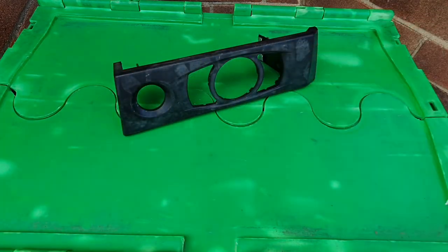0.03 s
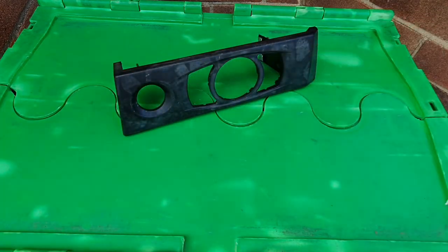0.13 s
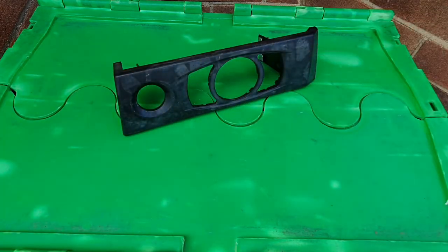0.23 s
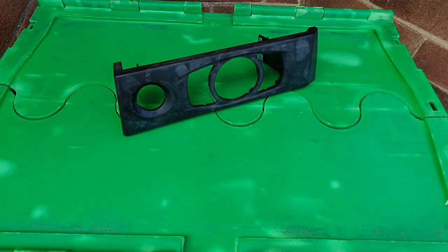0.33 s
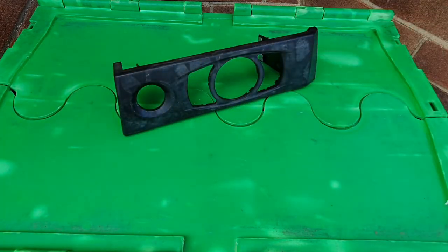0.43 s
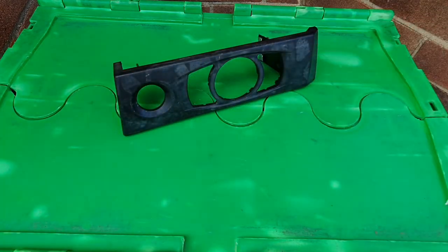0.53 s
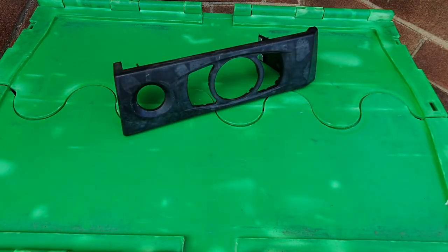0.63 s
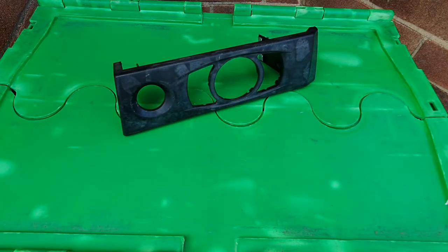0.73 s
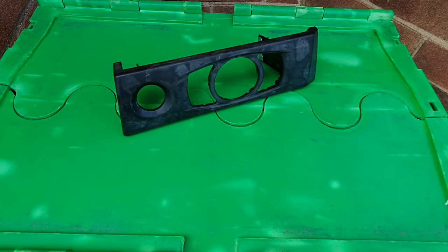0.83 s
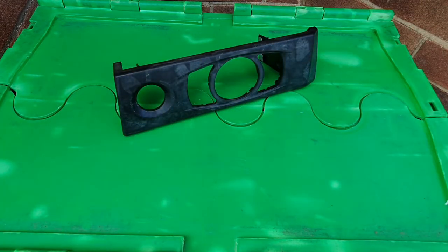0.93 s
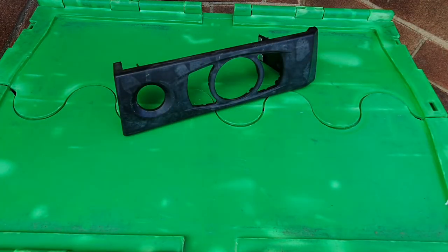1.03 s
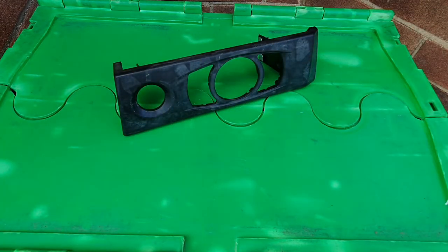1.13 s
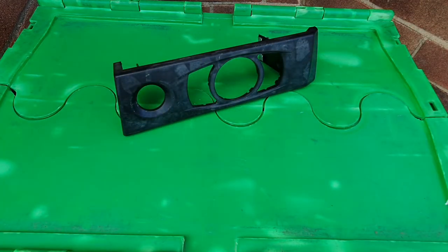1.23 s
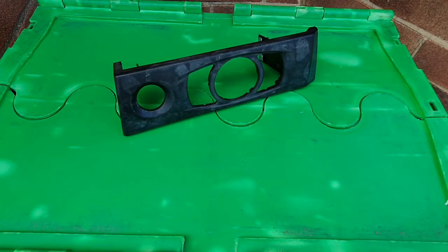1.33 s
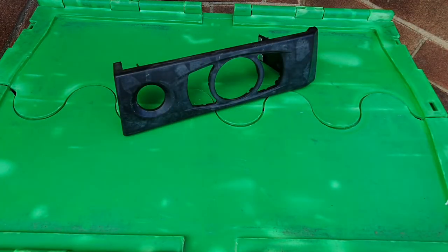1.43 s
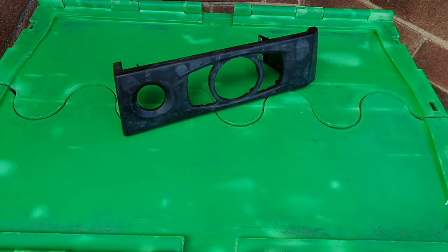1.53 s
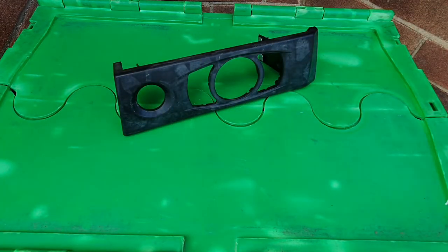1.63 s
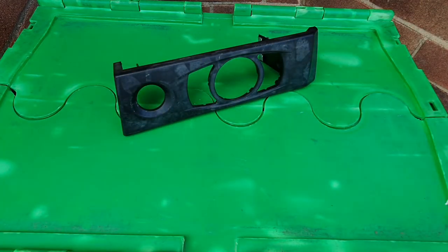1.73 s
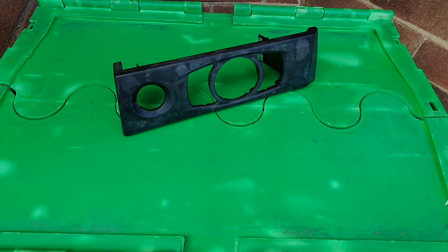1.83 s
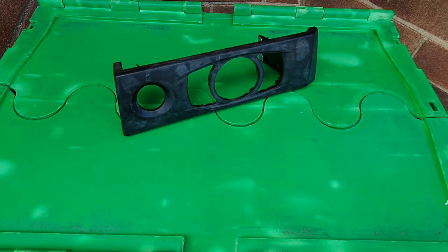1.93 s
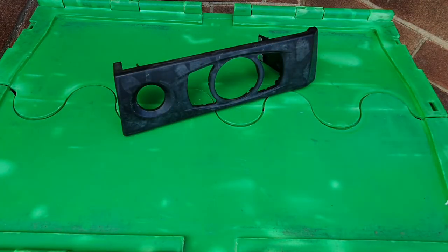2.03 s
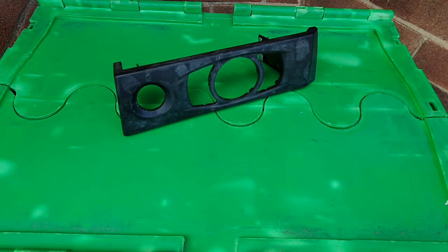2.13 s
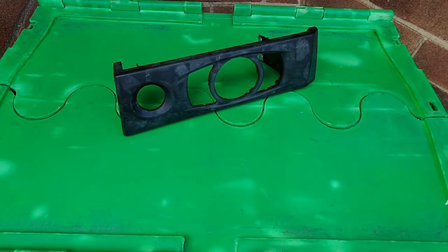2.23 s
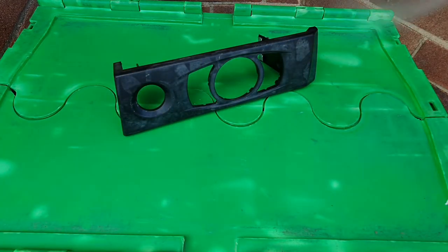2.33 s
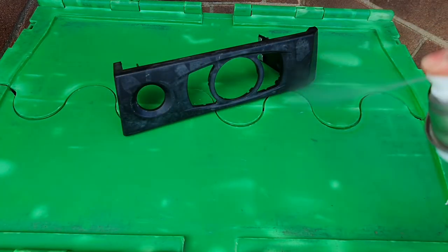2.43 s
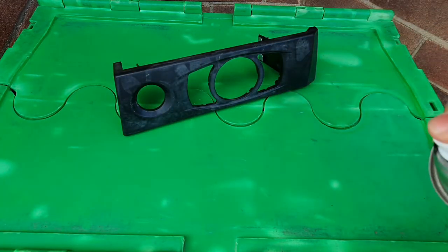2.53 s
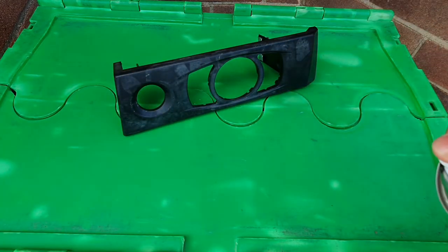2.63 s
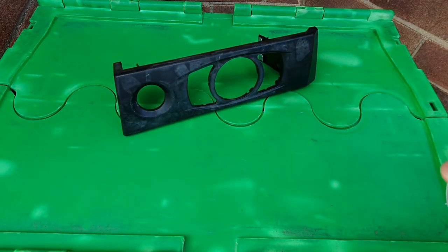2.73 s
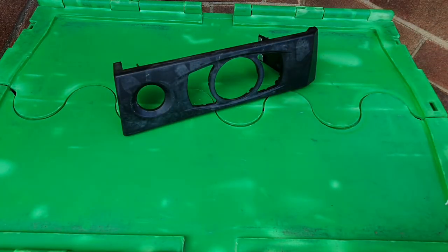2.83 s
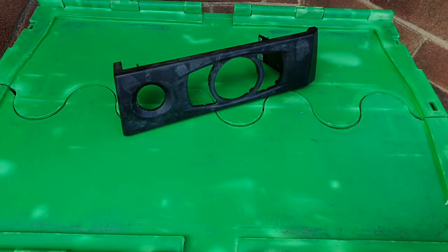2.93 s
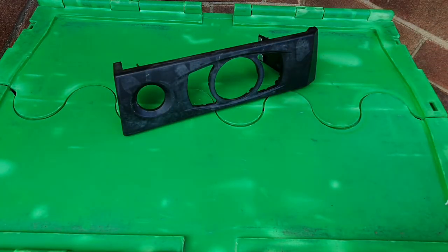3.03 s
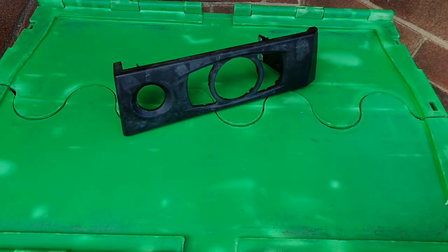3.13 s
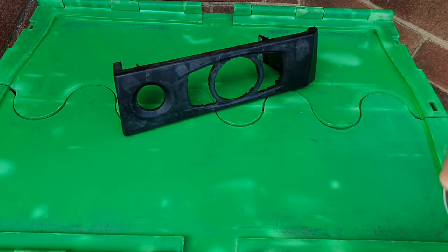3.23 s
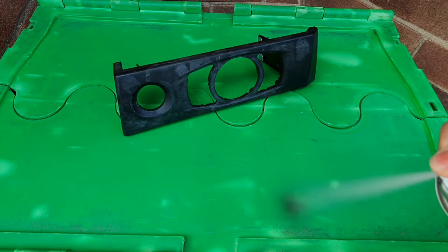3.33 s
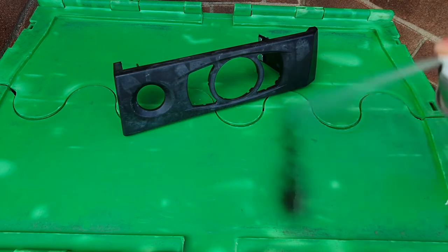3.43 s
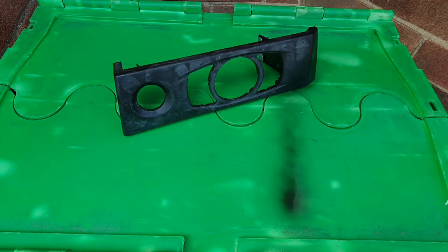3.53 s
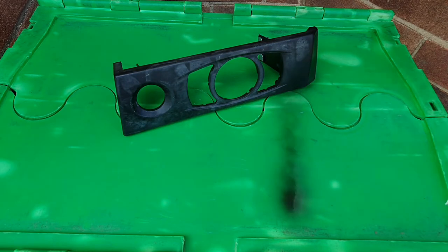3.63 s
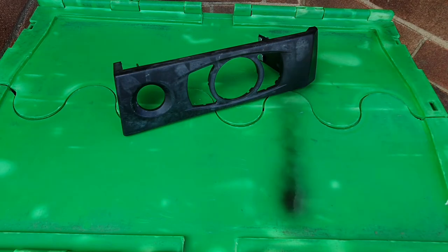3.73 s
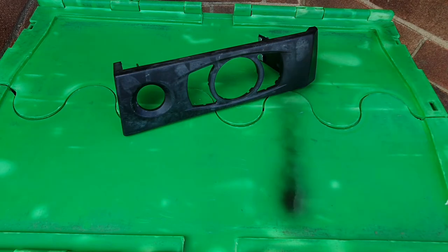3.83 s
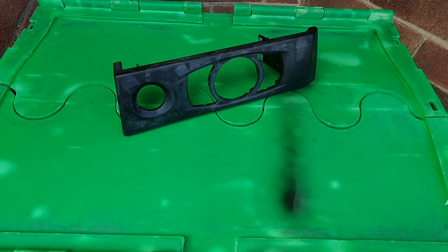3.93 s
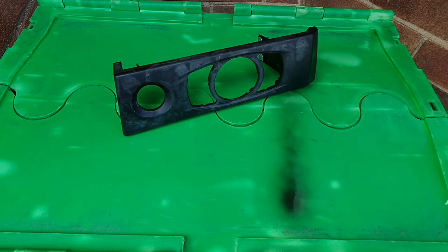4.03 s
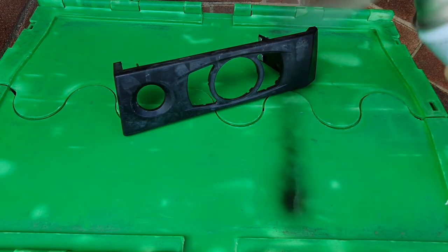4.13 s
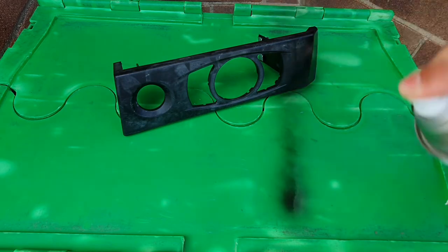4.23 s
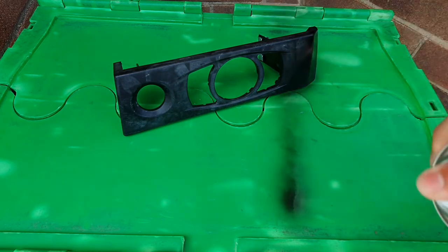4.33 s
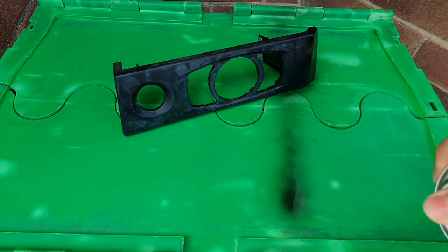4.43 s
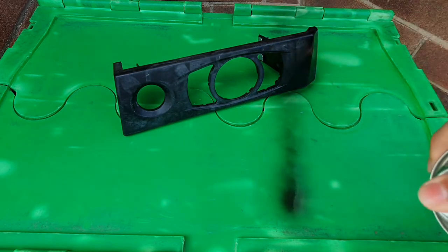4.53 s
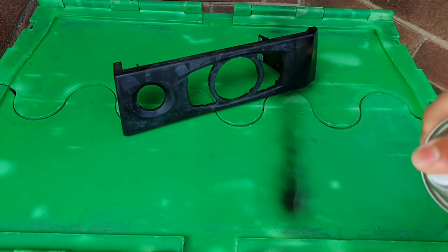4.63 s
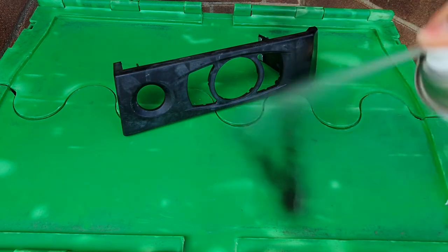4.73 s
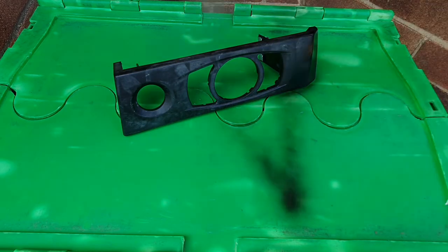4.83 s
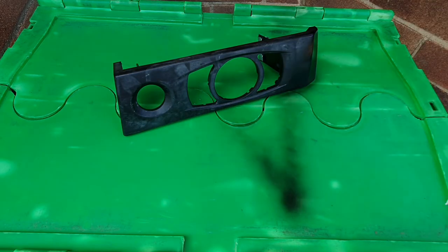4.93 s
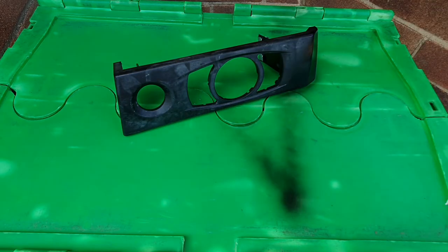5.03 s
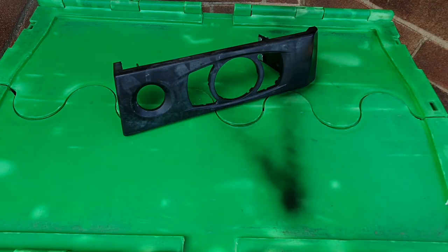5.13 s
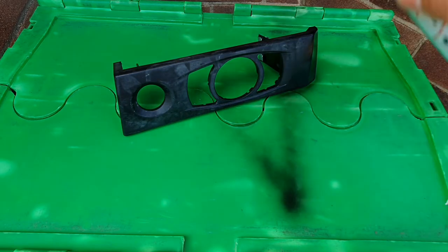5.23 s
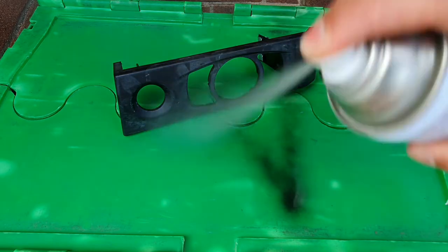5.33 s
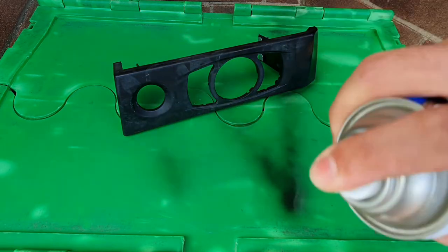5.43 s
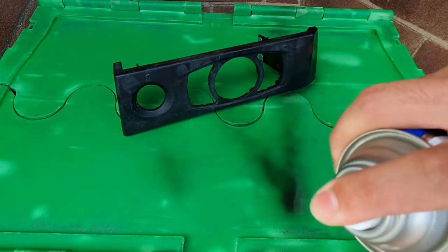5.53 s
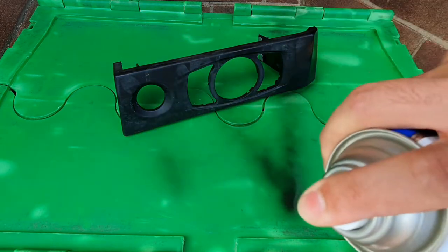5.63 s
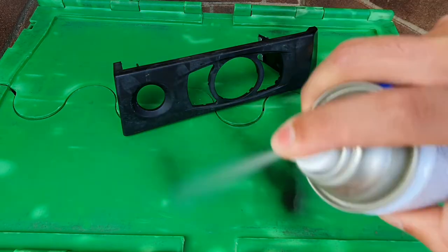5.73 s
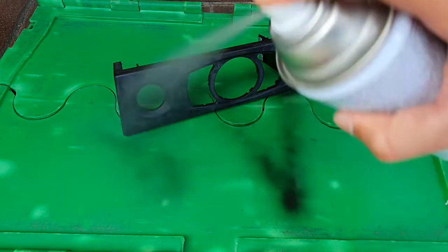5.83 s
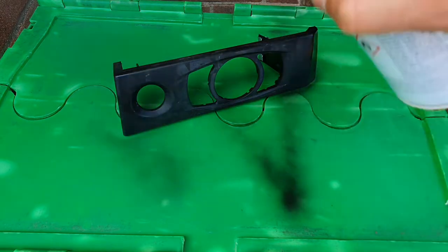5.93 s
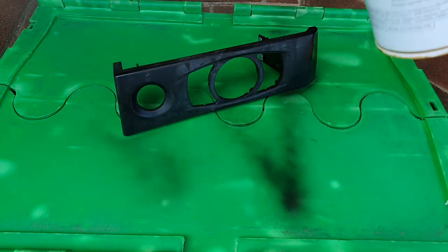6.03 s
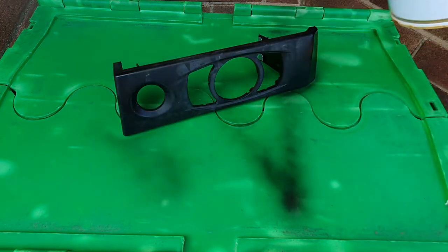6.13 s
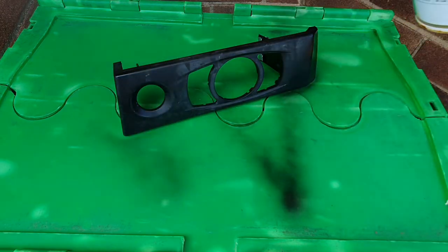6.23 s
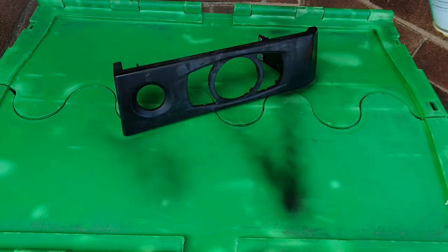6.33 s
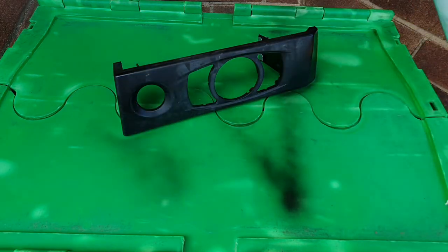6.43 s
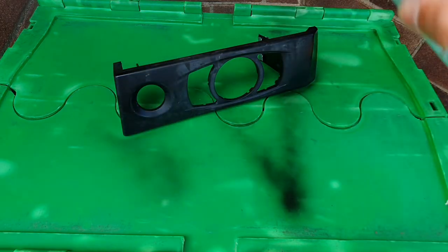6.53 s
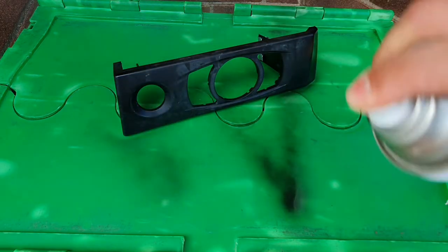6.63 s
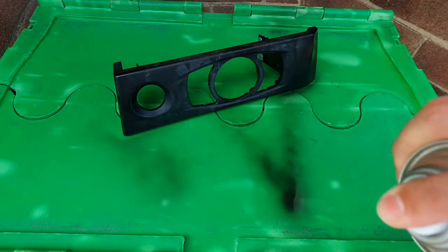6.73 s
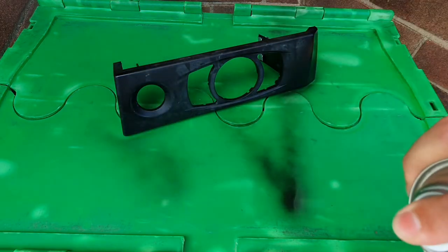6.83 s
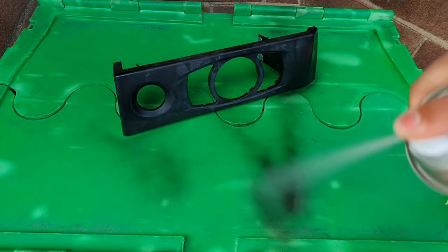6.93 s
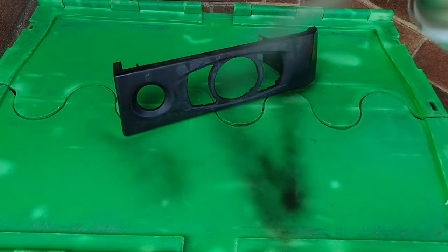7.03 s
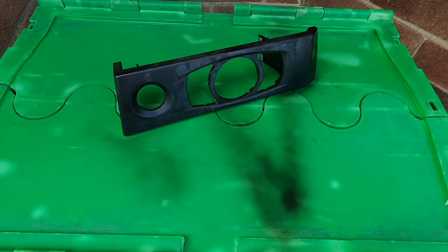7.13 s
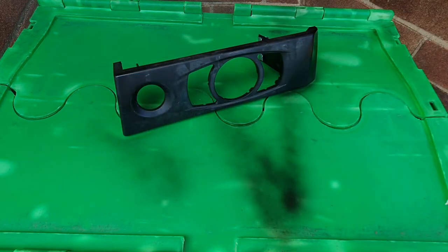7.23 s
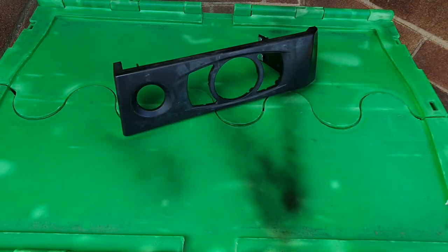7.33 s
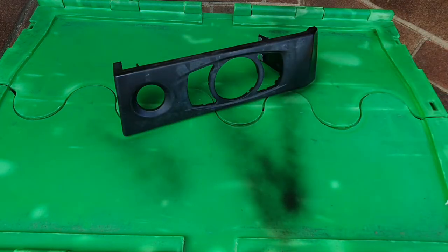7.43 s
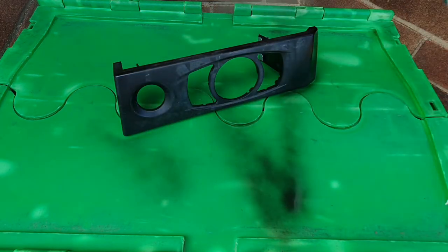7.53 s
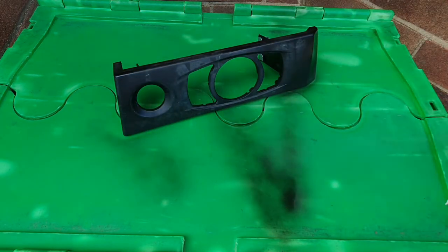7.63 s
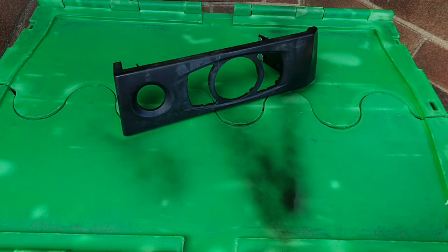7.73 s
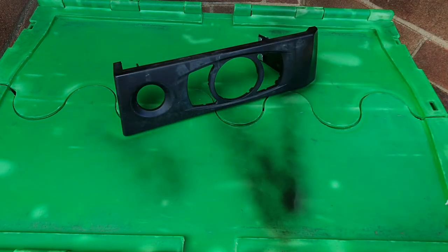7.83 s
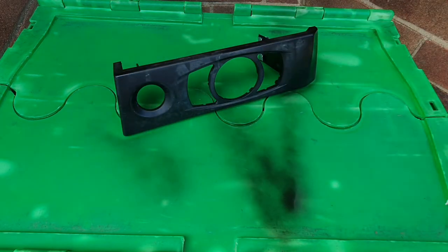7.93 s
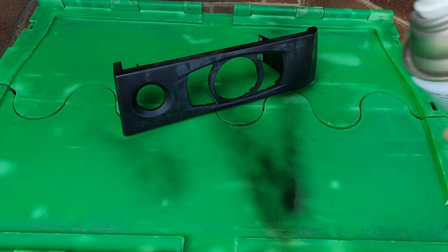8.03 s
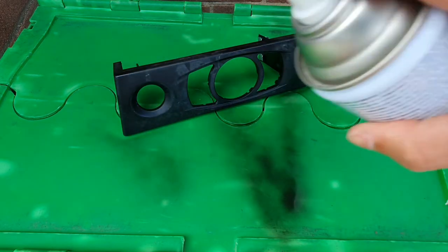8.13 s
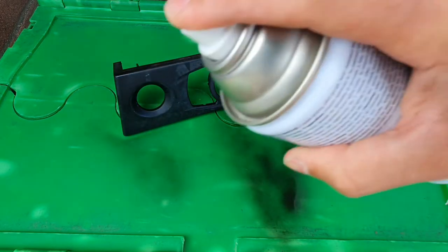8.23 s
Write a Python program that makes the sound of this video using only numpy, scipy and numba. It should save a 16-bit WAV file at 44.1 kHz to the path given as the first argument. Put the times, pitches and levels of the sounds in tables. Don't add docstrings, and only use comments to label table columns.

```python
import sys
import numpy as np
from scipy import signal
from scipy.fft import rfft, irfft
from scipy.io import wavfile
from scipy.ndimage import uniform_filter1d, minimum_filter1d
from numba import njit

SR = 44100
rng = np.random.default_rng(int(sys.argv[2]) if len(sys.argv) > 2 else 0)


def transcribe(signal):
    frames = np.atleast_2d(signal).T
    limited = np.clip(frames, -1, 1)
    pcm = np.round(limited * 32767).astype(np.int16)
    wavfile.write(sys.argv[1], SR, pcm)


def invert_db(x):
    u = np.asarray(x, float) / 20
    return 10 ** u


N = 365148
HZ = np.fft.rfftfreq(N, 1 / SR)
TIME = np.arange(N) / SR

# start_s, peak_db, ring_centre_hz, treble_db
HARD_SHAKE = [(0.031, -28, 1720, -10), (0.0493, -16.5, 2050, -13.5), (0.185, -17.5, 1800, -20.5),
              (0.2085, -11, 2120, -22.5), (0.2118, -13.5, 2580, -6.5), (0.2235, -11.5, 3740, -13.5),
              (0.2716, -11, 2080, -23), (0.3065, -8, 2150, -18.5), (0.3254, -6.5, 3640, -18),
              (0.3303, -6, 2740, -22), (0.343, -9, 3510, -14), (0.364, -12.5, 2120, -16.5),
              (0.406, -5.5, 2610, -19.5), (0.4188, -11.5, 1620, -16), (0.4477, -17.5, 2140, -12),
              (0.465, -14, 2310, -19), (0.477, -5.5, 6260, -18), (0.4858, -6, 4160, -7.5),
              (0.5205, -14.5, 2940, -19), (0.5363, -14.5, 1970, -27), (0.55, -20.5, 2810, -14),
              (0.618, -11.5, 3500, -14), (0.6769, -17, 2020, -20), (0.7024, -5, 4400, -21),
              (0.7062, -17.5, 5040, 2), (0.7456, -29.5, 2690, -20), (0.759, -17.5, 2240, -22),
              (0.8096, -22.5, 2270, -19), (0.8143, -12.5, 2200, -21.5), (0.828, -15, 3660, -8.5)]
# start_s, peak_db, ring_centre_hz, treble_db
SLOW_SHAKE = [(0.869, -16.5, 2490, -17), (0.8903, -6.5, 5270, -14.5), (0.903, -5, 4160, -31),
              (0.9073, -7, 3230, -7.5), (0.9347, -7, 3200, -6.5), (0.9577, -18, 2680, -28),
              (1.0105, -25, 2500, -31), (1.0175, -16.5, 2250, -23.5), (1.061, -17.5, 2100, -16),
              (1.1117, -21.5, 2680, -30), (1.118, -19.5, 2060, -22), (1.1777, -41, 1500, -28),
              (1.2013, -29, 2900, -31), (1.2192, -10, 4400, -19), (1.229, -14, 3540, -8),
              (1.312, -27.5, 3180, -15), (1.3346, -25, 2510, -15), (1.3433, -25.5, 4350, -27),
              (1.379, -26.5, 2260, -24), (1.4243, -31, 1600, -26), (1.448, -24, 3150, -20),
              (1.4567, -35, 4200, -28), (1.485, -22.5, 4200, -17), (1.5177, -34.5, 2010, -20),
              (1.5498, -24, 4320, -16), (1.565, -31.5, 4310, -14), (1.6244, -43, 1590, -19)]
OPEN_S = 0.018


def on_log(points, hz):
    f, db = np.transpose(points)
    return np.interp(np.log(np.maximum(hz, 1)), np.log(f), db)


def bell(hz, centre_hz, width_hz):
    return 1 / np.sqrt(1 + (2 * (hz - centre_hz) / width_hz) ** 2)


def curve(rows, column=1):
    rows = np.array(rows)
    return invert_db(np.interp(TIME, rows[:, 0], rows[:, column], -150, -150))


def walk(rate):
    k = int(SR / rate)
    steps = np.repeat(rng.standard_normal(N // k + 1), k)
    return 1.223 * uniform_filter1d(uniform_filter1d(steps, k), k)[:N]


def hiss(gain, lo_hz, hi_hz, alike, lag, flicker_db, rate, count=4):
    alike = np.clip(alike, 0, 1)
    shared, left, right = rfft(rng.standard_normal((3, N)))
    late = np.exp(-2j * np.pi * HZ * lag / SR)
    common = np.sqrt(alike) * shared * np.array([late, late ** 0])
    both = gain * (common + np.sqrt(1 - alike) * np.array([left, right]))
    place = (count + 1) * np.log(np.maximum(HZ, 1) / lo_hz) / np.log(hi_hz / lo_hz)
    out = np.zeros((2, N))
    for k in range(1, count + 1):
        band = irfft(both * np.clip(1 - abs(place - k), 0, 1), N)
        out += invert_db(flicker_db * walk(rate)) * band
    return out / np.sqrt(np.mean(out ** 2))


def passing(nearest_s, db, half_s):
    return invert_db(db) ** 2 / (1 + ((TIME - nearest_s) / half_s) ** 2) ** 2


def yard_notes():
    # centre_hz, width_hz, level_db
    resonances = [(298, 40, 0), (664, 23, 2), (800, 56, -9), (1670, 81, -9)]
    wall_hz = 317.8
    notes = 1 + sum(invert_db(db) * bell(HZ, f, w) for f, w, db in resonances)
    return notes * abs(1 + 0.18 * bell(HZ, 0, 2000) * np.exp(-2j * np.pi * HZ / wall_hz))


def road():
    # pitch_hz, level_db (per Hz)
    low_colour = [(16, -29.5), (28, -2), (49, -3.5), (87, 0.5), (106, -6.5), (141, -13.5), (221, -16),
                  (293, -17), (419, -16.5), (482, -22), (600, -42), (780, -59.5), (1320, -120)]
    # pitch_hz, level_db (per Hz)
    high_colour = [(300, -4), (500, -6), (1000, -1), (1600, -6.5), (2300, -9), (3500, -17), (5000, -24),
                   (6900, -27), (7400, -36.5), (9800, -36), (10300, -41), (15000, -51.5)]
    # nearest_s, roar_db, width_s, tyres_minus_roar_db
    car_rows = [
        (.2, -49, 0.34, -1.5),
        (2.6, -47, 0.42, -5.5),
        (3.22, -35.5, 0.47, -4.5),
        (5.0, -44, 0.93, -0.5),
        (5.7, -40.5, 0.33, -5.5),
        (6.15, -37.5, 0.44, -2),
        (8.03, -36, .35, -3),
    ]
    # time_s, level_db
    far_rumble = [(0, -37.5), (.4, -35.5), (.7, -39), (1.95, -39.5), (2.25, -33), (3.3, -32), (4.1, -35.5),
                  (4.85, -31.5), (5.7, -33), (6.45, -29), (7.1, -37.5), (7.6, -36), (7.95, -30.5),
                  (8.28, -34.5)]
    low, high = invert_db(on_log(low_colour, HZ)), invert_db(on_log(high_colour, HZ))
    notes = yard_notes()
    cars = [passing(*car[:3]) for car in car_rows]

    rumble = curve(far_rumble) * invert_db(2) * hiss(low, 22, 160, .98, 0, 1.6, 5, count=5)

    far_roar_db, far_tyres_db = -48, -50
    roar_gain = np.sqrt(invert_db(far_roar_db) ** 2 + sum(cars))
    roar_alike = np.interp(HZ, [140, 250], [.6, .95])
    roar = roar_gain * invert_db(2) * hiss(low * notes, 120, 720, roar_alike, -8.5, 1.66, 7.3)

    far = invert_db(far_tyres_db + 7) * hiss(high * notes, 267, 22000, 0.29, -8.5, 1.0, 10, count=9)
    shadow = 0.5 + bell(HZ, 0, 2 * 2600) ** 2
    tyre_gain = np.sqrt(sum(p * invert_db(car[3]) ** 2 for p, car in zip(cars, car_rows)))
    near = tyre_gain * invert_db(6) * hiss(high * notes * shadow, 267, 22000, 0.38, -8.5, 1.52, 9, count=6)
    return rumble + roar + far + near


def yard_echo(x, t60, wet_db):
    t = TIME[:SR // 2]
    tail = rng.standard_normal((2, len(t))) * np.exp(-np.log(1000) * t / t60) * (t > .006)
    tail = tail / np.sqrt(np.sum(tail ** 2, axis=1, keepdims=True))
    return x + invert_db(wet_db) * signal.fftconvolve(x, tail, axes=1)[:, :N]


@njit
def ring_modes(poles, starts, size):
    out = np.zeros((2, size))
    for m in range(len(poles)):
        z = 1 + 0j
        for i in range(size):
            out[0, i] += (starts[0, m] * z).imag
            out[1, i] += (starts[1, m] * z).imag
            z *= poles[m]
    return out


def stirring():
    blows = np.zeros(N)
    for s, db, _, _ in HARD_SHAKE + SLOW_SHAKE:
        blows[int(s * SR)] = invert_db(db)
    t = TIME[:SR // 3] / .014
    rest = invert_db(-64) * (TIME < 1.6)
    return invert_db(-36.5) * abs(signal.fftconvolve(blows, t * np.exp(1 - t))[:N]) + rest


def rattle():
    # pitch_hz, level_db (per Hz)
    tin_colour = [(290, -52), (500, -34), (1120, -2.5), (1470, -7), (2200, -7), (3850, -5), (6180, -2),
                  (7560, -12), (9790, -8), (13000, -10.5), (15500, -20)]
    # start_s, peak_db, ring_centre_hz, treble_db
    cap_ticks = [
        (2.59, -46, 4340, -23),
        (6.7136, -47, 4080, -18),
    ]
    out, t = np.zeros((2, N)), TIME[:SR // 7]
    for s, db, centre_hz, treble_db in HARD_SHAKE + SLOW_SHAKE + cap_ticks:
        t60 = .052 - .0013 * db
        size, loss = rng.standard_normal((2, 300))
        place, left, right = rng.random((3, 300))
        hz = 700 * (15400 / 700) ** np.sqrt(place)
        gain = invert_db(on_log(tin_colour, hz) + np.where(hz > 7000, treble_db + 19.5, 0))
        gain = gain * (0.14 + bell(hz, centre_hz, 0.23 * centre_hz))
        fade = np.log(1000) / np.clip(t60, .02, .2) * (hz / 3000) ** 0.2 * invert_db(2 * loss)
        turn = np.exp(2j * np.pi * np.array([left, np.where(size > .3, left, right)]))
        strength = gain * invert_db(3 * size)
        ring = ring_modes(np.exp((2j * np.pi * hz - fade) / SR), strength * turn, size=len(t))
        ring = ring / abs(ring).max() * (1 - np.exp(-t / 0.00095))
        ring = ring * (1 + 1.7 * np.exp(-t / 0.0025))
        click = (gain * hz) @ np.sin(2 * np.pi * hz[:, None] * t[:128]) * np.exp(-t[:128] / .0004)
        ring[:, :len(click)] += invert_db(6.5) * click / abs(click).max()
        chatter = np.zeros(SR // 30)
        when, weak = rng.random((2, 4))
        chatter[(when * len(chatter)).astype(int)] = invert_db(-9.5 - 16 * weak - 10 * when)
        chatter[0] = 1
        ring = signal.fftconvolve(ring, chatter[None], axes=1)
        ring = ring * invert_db(db + 7) / abs(ring).max()
        for port, lag in enumerate((8, -8)):
            i = int(s * SR) + lag
            out[port, i:i + ring.shape[1]] += ring[port]
    out = signal.sosfilt(signal.butter(3, 800, "high", fs=SR, output="sos"), out)
    slosh = stirring() * hiss(invert_db(on_log(tin_colour, HZ)), 900, 18000, 0.36, 47, 4.5, 40.5)
    both = yard_echo(out, 0.18, -26) + slosh
    both[1] = irfft(rfft(both[1]) * invert_db(1 + 4.5 * bell(HZ, 4500, 4500)), N)
    return both


def engines():
    # time_s, firing_hz, level_db, octave_minus_firing_db
    lorry = [(2.3, 45.2, -55, 11), (2.6, 46.1, -37.5, -7), (3.5, 47.77, -40, -7.5), (4.1, 48.1, -29, -16),
             (4.7, 48.3, -32.5, -9), (5, 48.5, -30, -0.5), (6.05, 47.4, -25.5, -9), (6.76, 46.4, -31, -1),
             (7.25, 45.6, -33.5, 3.5), (7.46, 45.53, -23.5, -9.5), (7.7, 45.4, -35.5, 1),
             (7.9, 45.38, -35.5, -21), (8.28, 45, -33, 7.5)]
    # time_s, firing_hz, level_db
    van = [
        (1.8, 62.7, -55),
        (2.5, 62.2, -32.5),
        (2.75, 62, -61),
        (2.95, 61.9, -38),
        (3.3, 61.7, -36),
        (3.7, 61.4, -31),
        (4.3, 60.9, -33.5),
        (5.44, 60.4, -35.5),
        (5.7, 60.3, -33),
        (6.6, 60, -57),
    ]
    load = invert_db(np.interp(TIME, *np.transpose(lorry)[[0, 3]]))
    out = 0
    for rows, order, share in ((lorry, 1, 1), (lorry, 2, load), (lorry, 4, invert_db(-24)), (van, 1, 1)):
        hz = order * np.interp(TIME, *np.transpose(rows)[:2]) * (1 + 0.0054 * walk(6))
        level = share * curve(rows, column=2) * invert_db(3.5 + 1.44 * walk(7))
        out = out + level * np.sin(2 * np.pi * np.cumsum(hz) / SR)
    return out


def valve(opens_s, shuts_s, db, sag_db):
    open_db, shut_db = -29, -41
    eases_s, held_db = shuts_s - 0.032, db + sag_db
    dribble_db = held_db - 8.5
    return curve([(opens_s, db + open_db), (opens_s + OPEN_S / 2, db + open_db / 3), (opens_s + OPEN_S, db),
                  (eases_s, held_db), (eases_s + 0.026, dribble_db),
                  (shuts_s, dribble_db - 3.5), (shuts_s + 0.024, held_db + shut_db)])


def coarse_treble(x, from_hz, share, size=2048):
    f, _, z = signal.stft(x, SR, nperseg=size)
    weak = abs(z) ** 2 < share * uniform_filter1d(abs(z) ** 2, size=16, axis=1)
    return signal.istft(np.where(weak & (f > from_hz)[:, None], 0, z), SR, nperseg=size)[1][:, :N]


def mat_bounce(x, share, delay_s, sway_s):
    late = [np.interp(TIME - delay_s - sway_s * walk(3), TIME, port) for port in x]
    return x + share * np.array(late)


def spray():
    # opens_s, shuts_s, hiss_db, sag_db (while held), left_minus_right_db
    presses = [
        (2.247, 2.46, -32.5, 3, 4),
        (3.301, 3.544, -30, -2, 3),
        (4.019, 4.244, -30, -9.5, 3),
        (4.656, 4.888, -29, -3.5, 4),
        (5.211, 5.404, -29.5, -4.5, 6.5),
        (5.736, 5.985, -28.5, -6.5, 8),
        (6.381, 6.612, -31, -3, 3.5),
        (6.879, 7.145, -31, -3.5, 4.5),
        (7.429, 7.658, -31.5, -2, 4),
    ]
    left_lags = [6, 7, 4, 6, 0, -4, 1, 4, 6]
    # pitch_hz, level_db (per Hz)
    jet_colour = [(650, -29), (1100, -1.5), (1430, -5.5), (2090, -0.5), (2390, 0), (2790, -3.5), (3110, -8),
                  (3760, -3.5), (6250, 0), (7720, -5), (11400, -2), (14800, 1.5), (15500, 0)]
    # centre_hz, width_hz, level_db
    whistles = [(2250, 226, -22), (6650, 250, -4), (11000, 1000, -15.5), (12100, 1800, -8)]
    colour = invert_db(on_log(jet_colour, HZ)) * (1 + sum(invert_db(db) * bell(HZ, f, w) for f, w, db in whistles))
    bright = hiss(colour, 2740, 19500, 0.13, 0, 2.35, 45, count=16)
    bright = coarse_treble(bright, 4500, .9)
    body = hiss(colour, 730, 4350, 0.53, 0, 2.1, 25, count=7)
    sputter = invert_db(1.2 * walk(300) + .9 * walk(40))
    out = np.zeros((2, N))
    sway = walk(11)
    for (opens_s, shuts_s, db, sag_db, side_db), lag in zip(presses, left_lags):
        body_db = -3 + 5 * np.exp(-abs(TIME - opens_s) / 0.026)
        surge = invert_db(1.5 * np.exp(-abs(TIME - opens_s - OPEN_S) / .03))
        flow = valve(opens_s, shuts_s, db, sag_db) * surge * sputter
        jet = flow * (bright * invert_db(9) + body * invert_db(body_db))
        pan_db = side_db + 1.2 * sway - 6.5
        out += [np.roll(jet[0], lag) * invert_db(pan_db / 2), jet[1] * invert_db(-pan_db / 2)]
    out = mat_bounce(out, .28, .0021, .0004)
    return yard_echo(out, 0.34, -27)


def near_car():
    notes = yard_notes()
    rush_db, near_db = -29.5, -38
    rush = passing(7.82, rush_db, 0.037) / invert_db(rush_db)
    near = passing(8.12, near_db, .36) / invert_db(near_db)
    hollow = np.hypot(rush, near) * hiss(notes, 513, 1160, 0.83, -0.5, 2.2, 28)
    return hollow + near * invert_db(3) * hiss(notes, 820, 1750, 0.34, -9.5, 1.5, 12)


def sleeve():
    # middle_s, level_db, width_s
    brushes = [
        (7.975, -52, 0.014),
        (8.06, -55, 0.032),
        (8.28, -65, .004),
    ]
    strokes = sum(passing(*row) / invert_db(row[1]) for row in brushes)
    return strokes * invert_db(-2.5) * hiss(1, 6000, 16000, 0.22, 0, 2.5, 60)


def scene():
    return road() + rattle() + engines() + spray() + near_car() + sleeve()


def drop_weak_treble(x, from_hz, jump_db, below_db, scatter_db, size=256):
    f, _, z = signal.stft(x, SR, nperseg=size, noverlap=size // 2)
    power = uniform_filter1d(np.sum(abs(z) ** 2, axis=0), size=7, axis=0)
    top = -minimum_filter1d(-power, size=11, axis=1, origin=5)
    treble = power[f > from_hz].sum(axis=0)
    jump = treble[2:] > treble[:-2] * invert_db(jump_db) ** 2
    near_knock = np.convolve(jump, np.ones(13))[:len(treble)] > 0
    patch = np.kron(rng.standard_normal((len(f) // 5 + 1, z.shape[2] // 2 + 1)), np.ones((5, 2)))
    weak = power < top * invert_db(scatter_db * patch[:len(f), :z.shape[2]] - below_db) ** 2
    z = np.where(weak & near_knock & (f > from_hz)[:, None], 0, z)
    return signal.istft(z, SR, nperseg=size, noverlap=size // 2)[1][:, :N]


def top_cut(x):
    return signal.sosfilt(signal.butter(12, 16820, fs=SR, output="sos"), x)


def record(dry):
    # pitch_hz, level_db
    right_colour = [(60, -1.5), (200, -4), (700, -6), (2400, -10.5), (4400, -14.5), (7000, -18.5),
                    (8000, -20.5), (9200, -1), (11500, -5.5), (15000, -9.5)]
    # pitch_hz, level_db
    phone_band = [(30, -14), (40, 0), (15420, 0), (15560, -28), (16300, -58)]
    ports = invert_db(on_log(phone_band, HZ) + np.array([0 * HZ, on_log(right_colour, HZ)]))
    heard = irfft(rfft(dry) * ports, N)
    mix = drop_weak_treble(heard, from_hz=6900, jump_db=7, below_db=13, scatter_db=7)
    return top_cut(mix)


dry = scene()
out = record(dry)
transcribe(out)
```